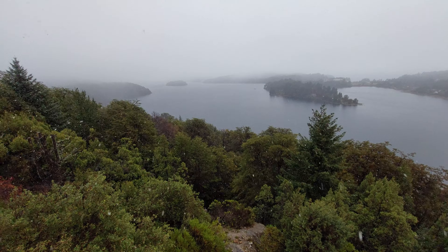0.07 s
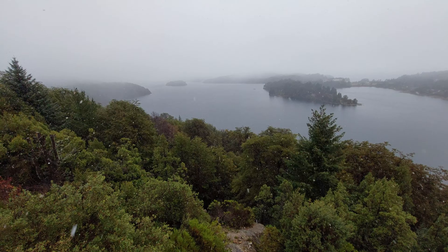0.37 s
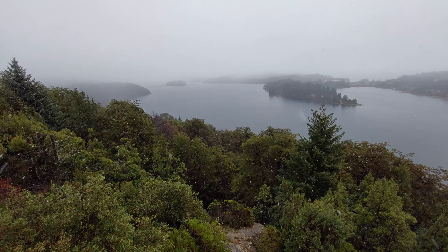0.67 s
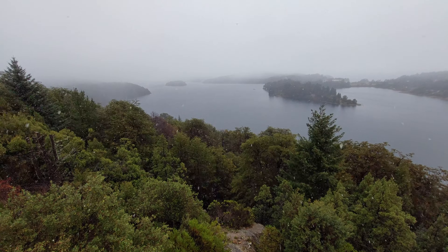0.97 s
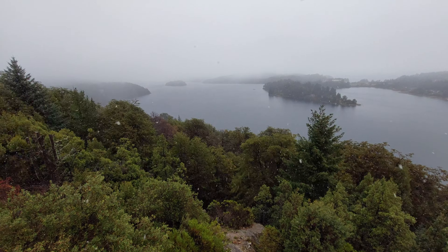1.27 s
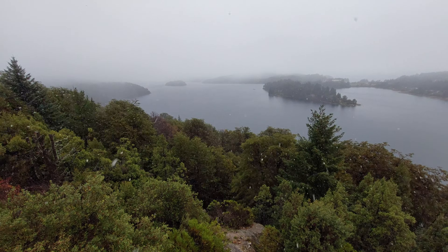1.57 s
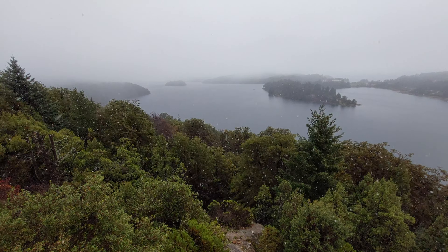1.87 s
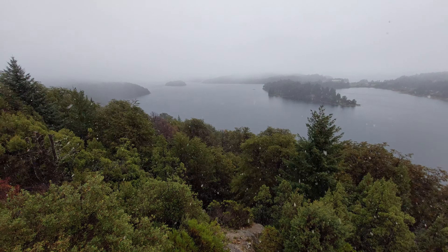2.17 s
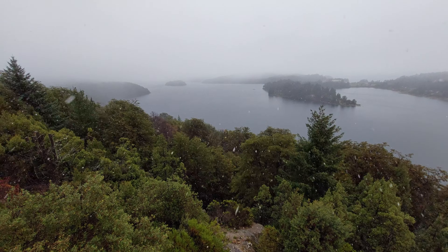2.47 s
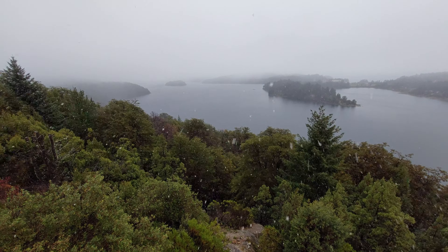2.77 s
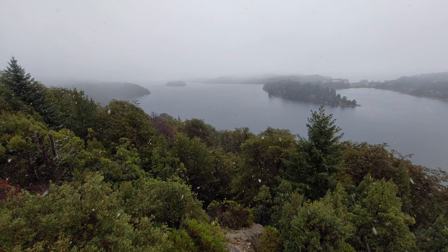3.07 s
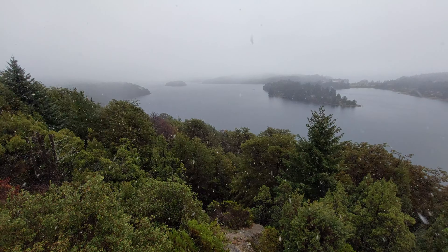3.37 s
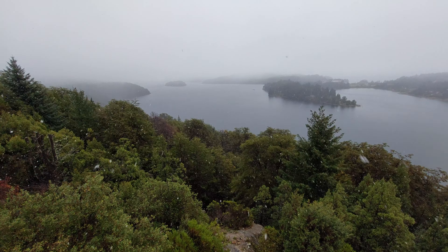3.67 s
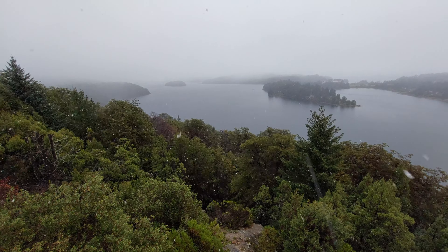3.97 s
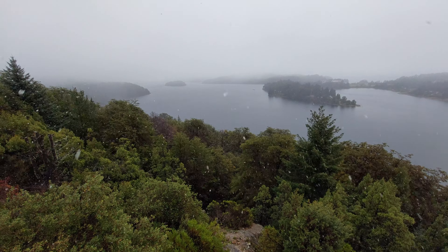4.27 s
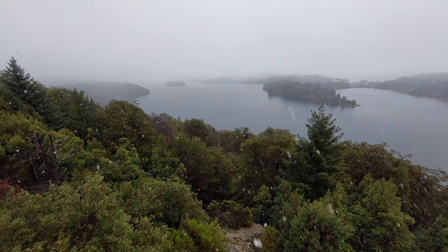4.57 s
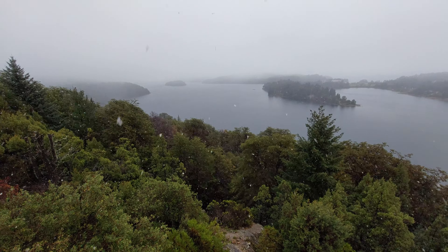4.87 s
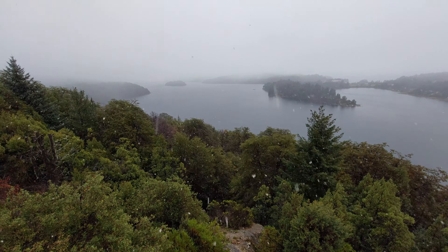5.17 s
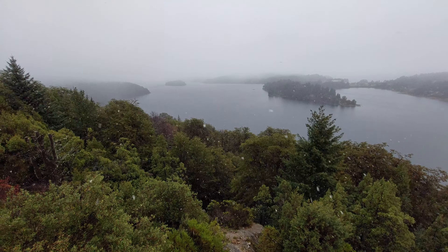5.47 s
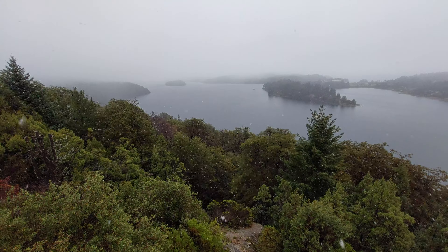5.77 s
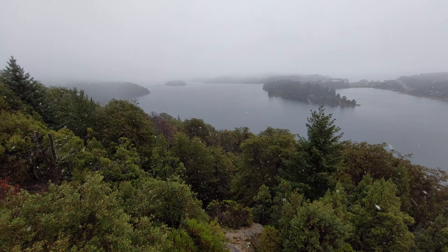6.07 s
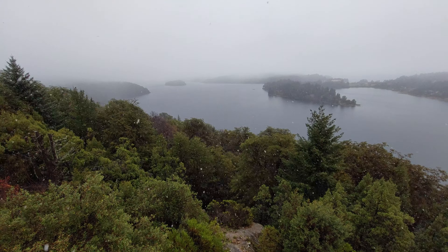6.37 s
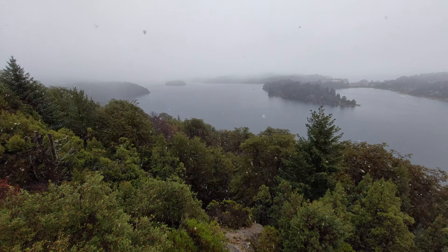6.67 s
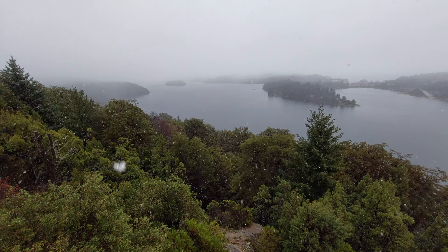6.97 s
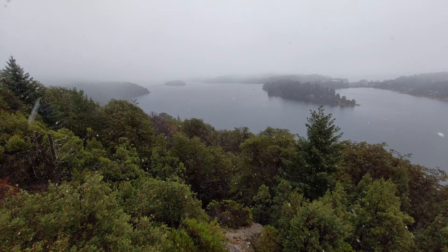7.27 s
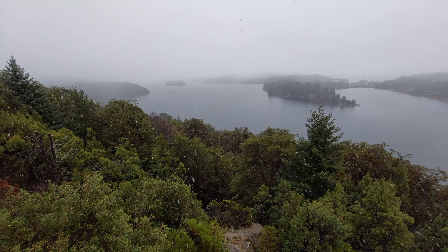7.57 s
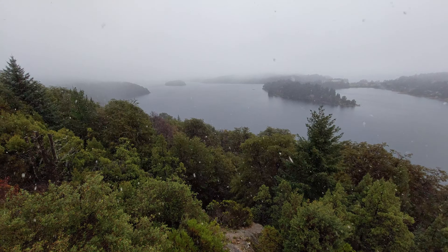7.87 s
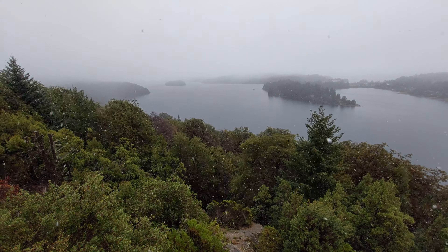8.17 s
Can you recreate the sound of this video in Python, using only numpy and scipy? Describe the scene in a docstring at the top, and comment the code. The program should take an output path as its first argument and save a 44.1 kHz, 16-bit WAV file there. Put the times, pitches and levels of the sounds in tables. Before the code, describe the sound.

A soft rumble of far traffic and a faint engine drone lie under light snow ticking on nearby leaves and the microphone. A small bird chips faintly and regularly among the trees. After about three seconds, uneven gusts buffet the microphone with low thumps, the loudest sounds here, then ease and return twice. Meanwhile a distant vehicle hums gradually nearer on a wet road across the open, wooded hillside.

```python
"""Light snow above a lake

On a wooded slope, small gusts buffet the two ports of the microphone. Far off, roads rumble, an
engine drones across the water, and a vehicle hums and rolls nearer on wet tyres to the right.
Among the trees a small bird repeats a faint, sharp chip, each one a fast downward sweep.
Close by, flakes tick on and around the microphone as their crystals crush, and patter on leaves."""
import sys
import numpy as np
from scipy import signal
from scipy.fft import rfft, irfft, next_fast_len
from scipy.io import wavfile
from scipy.ndimage import uniform_filter1d

SR = 44100
rng = np.random.default_rng(int(sys.argv[2]) if len(sys.argv) > 2 else 0)


def bounce(signal):
    """Save signal as a 16-bit WAV file at the path given by the first command-line argument."""
    frames = np.transpose(np.atleast_2d(signal))
    limited = np.clip(frames, -1, 1)
    pcm = np.round(limited * 32767).astype(np.int16)
    wavfile.write(sys.argv[1], SR, pcm)


N = 362502
TIME = np.arange(N) / SR
FFT_SIZE = next_fast_len(N)
BINS_HZ = np.fft.rfftfreq(FFT_SIZE, 1 / SR)

# Balance of far noise, leaning right through the mids: freq_hz, left_minus_right_db
FAR_LEAN = [(60, 3), (380, 3), (700, -3.5), (1200, -4.5), (2100, -11.5), (3200, -1.5), (4500, -14),
            (8000, 14), (15000, -4)]
# Colours of the distant roads and the faint hiss: freq_hz, gain_db
VALLEY_COLOUR = [(20, -21.5), (65, -1), (130, 1), (185, -15), (240, -7), (400, -12), (690, -14.5),
                 (950, -25), (1200, -22), (1600, -26), (2050, -31), (3000, -42.5), (8000, -50)]
HISS_COLOUR = [(1000, 2), (3200, -3), (4400, 5.5), (5700, -1.5), (8500, -3.5), (11300, -8.5), (12200, -9),
               (14000, -4), (16000, -16)]
# Partials of the engine across the water: level_db
ENGINE_PARTIALS = [-63.5, -69, -79]
# How well its second partial carries: time_s, gain_db
ENGINE_CARRY = [(0, -2), (2.5, -1), (4.8, -1), (5.2, 6), (5.6, -2), (6.8, 4), (7.1, 13), (7.55, 13),
                (8.22, 4)]
# Breeze on the ports between gusts: time_s, relative_db
BREEZE = [(0.14, -62), (0.88, -60.5), (1.12, -50), (1.55, -47.5), (2.0, -51), (2.45, -50.5), (3.0, -48),
          (3.65, -43.5), (4.0, -50), (4.5, -50.5), (5.0, -56), (5.5, -57), (6.25, -55), (6.6, -50),
          (7.1, -47), (7.55, -47), (8.22, -48)]
# Gusts striking the ports: start_s, hold_s, relative_db, left_minus_right_db
GUSTS = [(2.7, .05, -44.5, -7), (3.075, .04, -40, -2), (3.13, .07, -35, -1), (3.22, .11, -37.5, 1),
         (3.395, .025, -33.5, -1), (3.49, .06, -38, 4), (3.765, .03, -36, -4), (3.83, .025, -40, 3),
         (4.015, .045, -38, -24), (4.15, .04, -42, -12), (4.255, .05, -41.5, 0), (4.57, .05, -45.5, 12),
         (4.73, .04, -39.5, 11), (5.615, .025, -47, 10), (5.71, .1, -41.5, 8), (5.825, .025, -35, 10),
         (5.915, .025, -37.5, -19), (6.52, .04, -44, -12), (6.63, .04, -41.5, -12), (7.27, .06, -39.5, -6),
         (7.385, .08, -39.5, 6), (7.755, .11, -35, 8), (7.885, .075, -40.5, 2), (8.135, .045, -33, -20)]
# Colours of the wind's low buffeting and higher flutter: freq_hz, gain_db
BUFFET_COLOUR = [(15, -31), (28, -18.5), (50, 0.5), (70, 2), (125, 0), (155, -5.5), (190, -19.5),
                 (240, -14), (330, -33), (600, -41.5), (1500, -72), (6000, -100)]
FLUTTER_COLOUR = [(70, -33), (160, 3.5), (235, 1), (310, -3), (450, -17.5), (800, -29.5), (2500, -52),
                  (8000, -85)]
# Single eddies thumping a port: centre_s, relative_db, pitch_hz, width_s, left_minus_right_db
EDDIES = [(2.35, -32, 75, .016, 14), (3.077, -27, 230, .002, -22), (3.122, -26, 110, .004, -22),
          (3.138, -19.5, 115, .005, -24), (3.152, -22, 75, .006, 20), (3.212, -26, 140, .004, -12),
          (3.314, -25, 70, .009, -4), (3.4715, -11.5, 205, 0.0016, -28), (3.477, -23, 130, .004, -24),
          (3.522, -23, 100, .007, 22), (3.54, -19.5, 120, .004, 24), (3.766, -21, 150, .003, -12),
          (3.781, -13, 95, .0055, -27), (3.789, -20.5, 240, 0.002, -27), (4.023, -23.5, 125, .007, -24),
          (4.053, -25, 135, .005, -24), (5.783, -28, 85, .009, 10), (5.847, -19, 72, 0.009, 21),
          (5.931, -25, 170, .003, -20), (7.791, -25, 80, 0.025, 18), (7.858, -26, 80, .011, 6),
          (7.944, -27, 135, .011, 0), (8.15, -26.5, 190, .005, -22), (8.163, -22, 85, .014, -22)]
# Tyres coming nearer: time_s, roar_db, tread_db, spray_db
TYRE_LEVELS = [(0.1, -87, -85.5, -95), (1.5, -64, -77, -83), (2.8, -65, -73, -85), (3.5, -59, -68, -80),
               (4.6, -56, -72, -78), (5.5, -52, -66, -77), (6, -52, -66, -82), (7.1, -50, -64.5, -77.5),
               (7.6, -49.7, -62, -69.5), (7.88, -49.5, -56.5, -66), (8.05, -49.8, -60.5, -70),
               (8.22, -50, -58.5, -73)]
# Colours of their roar, tread and wet spray: freq_hz, gain_db
ROAR_COLOUR = [(40, -11), (75, -3.5), (120, -3), (180, -1.5), (240, 8.5), (330, 8.5), (400, 5), (520, 3),
               (680, -0.5), (1050, -4), (1450, -10.5), (2200, -21), (4000, -44)]
TREAD_COLOUR = [(700, -20), (1400, -4), (1950, 2.5), (2450, -4.5), (3100, -14), (4400, -18), (6500, -22),
                (15000, -41)]
SPRAY_COLOUR = [(1400, -14), (2000, 7), (3200, -.5), (4300, .5), (5800, -10), (9000, -24), (15000, -29)]
# Two sinking bands lifted by the ground reflection: time_s, lower_hz, lower_db, upper_hz, upper_db
GROUND_BANDS = [(0.1, 1300, -82.5, 2580, -96), (3.5, 1304, -71, 2400, -80), (4.6, 1078, -66.5, 2300, -78),
                (5.2, 987, -63, 2244, -79), (5.9, 850, -61.5, 2102, -73.5), (6.7, 689, -64, 1600, -66.5),
                (7.05, 640, -62, 1250, -63), (7.6, 560, -64, 1090, -57), (8.22, 502, -65, 940, -61)]
# Bird chips among the trees: time_s, relative_db
CHIPS = [(0.1755, -63.5), (0.758, -61), (1.2225, -61), (1.6525, -63.5), (2.0926, -61), (2.591, -67),
         (2.998, -61), (3.5427, -59), (4.0844, -63), (4.4233, -64), (5.005, -61), (5.5194, -60),
         (6.1155, -62.5), (6.7474, -60), (7.4648, -57), (7.9863, -57.5)]
# The vehicle's hum, swelling and dipping with the air on its way: time_s, level_db
HUM_LEVEL = [(.4, -85), (1.3, -65), (1.7, -62.5), (2.1, -66), (2.55, -56.5), (2.95, -66), (4, -57),
             (4.45, -50.5), (4.85, -58), (5.1, -53.5), (5.55, -55.5), (5.9, -51), (6.35, -49), (6.6, -45.5),
             (6.95, -43.3), (7.3, -47), (7.7, -50.5), (8.15, -45.5)]
# Its note: time_s, pitch_hz
HUM_PITCH = [(0, 280), (1, 298), (2.1, 316), (3.1, 330), (4.45, 339), (5.2, 343.5), (5.7, 344.5),
             (6.75, 341), (7.45, 335.5), (8.22, 327.5)]
# Colour of the snow's patter through the microphone's treble resonance: freq_hz, gain_db
SNOW_COLOUR = [(700, -18), (1900, 6), (3100, 1.5), (4400, 5.5), (6500, 1.5), (8500, 0), (11300, -2.5),
               (12300, -7), (14000, -4.5), (16000, -7)]
# Fine snow blown onto the nearest leaves: start_s, hold_s, level_db, left_minus_right_db
FLURRIES = [(.77, .22, -77.5, 3), (1.2, .33, -79, 3), (2.3, .35, -80, 1), (3.04, .16, -70.5, 1),
            (3.24, .14, -75, 2), (3.39, .13, -71, 2), (3.76, .2, -73, 2), (4.07, .12, -69, 2),
            (4.2, .12, -73, 3), (4.5, .26, -75, 2), (4.95, .32, -75, 2), (5.85, .16, -77, 2),
            (6.2, .2, -76, 2), (6.5, .55, -76, 2), (7.62, .07, -69.5, 3)]
# Flakes landing close by: start_s, relative_db, low_hz, high_hz, left_minus_right_db, crush_t60_s
FLAKES = [(.7555, -59.5, 3500, 12000, 8, .03), (.756, -60, 1200, 3000, 3, .05),
          (.80, -69, 2500, 13000, 6, .012), (.8455, -68, 2800, 15000, 3, .006),
          (.948, -69, 6500, 11000, 3, .012), (.988, -67, 2500, 12000, 2, .01),
          (1.209, -70, 6000, 13000, 1, .02), (1.31, -69, 3500, 9000, 2, .012),
          (1.3887, -56, 7000, 14500, 9, .004), (2.347, -65, 5000, 9000, -4, .01),
          (2.528, -66, 4000, 9000, 2, .012), (2.59, -60.5, 1400, 6500, 2, .022),
          (2.7, -57, 550, 800, 0, .02), (3.0203, -57, 4800, 8000, 8, .014),
          (3.0385, -56, 2800, 7500, -1, .04), (3.04, -57, 1600, 2400, -1, .05),
          (3.081, -60.5, 1400, 7000, -2, .03), (3.105, -65, 3000, 6000, 0, .025),
          (3.12, -58, 1100, 2800, -2, .045), (3.14, -62, 1200, 3500, -1, .05),
          (3.166, -64, 1300, 4000, 0, .04), (3.255, -67, 5800, 6800, 2, .015),
          (3.304, -65, 4300, 5300, 0, .015), (3.342, -67, 7000, 14000, 2, .01),
          (3.419, -60, 3500, 9000, 5, .012), (3.441, -61, 3300, 8500, 3, .01),
          (3.497, -58, 2800, 5200, -4, .008), (3.682, -64, 6000, 9500, -4, .03),
          (3.861, -53.5, 1400, 1950, 0, .02), (3.862, -60, 4500, 15500, 4, .014),
          (4.061, -55.5, 3700, 5600, -5, .008), (4.108, -55, 4400, 7000, -2, .007),
          (4.115, -62, 10500, 15500, 0, .1), (4.224, -64, 2000, 9000, 4, .012),
          (4.275, -58.5, 6300, 9500, 11, .025), (4.294, -64, 4800, 8000, 4, .02),
          (4.7762, -64, 6500, 10000, 3, .008), (4.881, -65, 4500, 10000, 5, .009),
          (4.891, -61.5, 4000, 9000, 3, .014), (4.974, -63, 2500, 10000, 2, .016),
          (5.056, -64, 3500, 9000, 2, .006), (5.0815, -62, 4800, 9000, 6, .014),
          (5.15, -61.5, 3700, 5000, 0, .015), (5.198, -64.5, 1500, 4200, 0, .05),
          (5.234, -66, 1800, 8000, 0, .02), (5.256, -65.5, 2800, 5000, 0, .01),
          (5.349, -59.5, 1700, 2900, -2, .015), (5.8015, -55.5, 5200, 8300, 17, .006),
          (6.2053, -63, 4000, 10000, 2, .008), (6.245, -66, 5000, 15000, 0, .012),
          (6.529, -60.5, 2500, 7500, 2, .009), (7.614, -53, 1700, 6500, 3, .028),
          (7.638, -52.5, 1900, 6000, 3, .045), (7.652, -55, 1900, 5500, 1, .05),
          (7.68, -59, 1900, 7000, 4, .03), (7.729, -66.5, 13000, 15500, 4, .008),
          (7.873, -63, 3500, 7000, 2, .012), (7.963, -65, 5000, 9500, 3, .012),
          (8.141, -62, 7000, 10500, 10, .008)]


def undb(db):
    """Decibels to amplitude."""
    return 10 ** (np.asarray(db) / 20)


def unit(x):
    """Scale to unit RMS."""
    return x / np.sqrt(np.mean(x ** 2))


def curves(table):
    """The columns of a table, joined by straight lines in time."""
    time_s, *columns = np.transpose(table)
    return [np.interp(TIME, time_s, column) for column in columns]


def gain_at(colour):
    """Gain of a colour table at each frequency bin."""
    hz, db = np.transpose(colour)
    return undb(np.interp(np.log(BINS_HZ + 1), np.log(hz), db))


def pan(side_db):
    """Left and right gains of constant power; positive is left."""
    gains = undb(np.array([side_db, -side_db]).reshape(2, -1) / 2)
    return gains / np.sqrt(np.mean(gains ** 2, axis=0))


def walk(rate_hz):
    """Random steps, smoothed twice, at unit RMS."""
    hold = max(int(SR / rate_hz), 2)
    steps = np.repeat(rng.standard_normal(N // hold + 1), hold)
    return unit(uniform_filter1d(uniform_filter1d(steps, hold), hold)[:N])


def band(x, low_hz, high_hz):
    """Gentle causal band-pass."""
    sos = signal.butter(2, [low_hz, min(high_hz, .48 * SR)], "band", fs=SR, output="sos")
    return signal.sosfilt(sos, x)


def add(out, start_s, sound):
    """Mix a short sound in."""
    i = max(int(start_s * SR), 0)
    out[:, i:i + sound.shape[-1]] += sound[:, :max(N - i, 0)]


def white_pair():
    """Spectra of two unrelated white noises."""
    return rng.standard_normal((2, 2 * len(BINS_HZ))).view(complex)


def noise(colour):
    """Unrelated noise at each port, at unit RMS."""
    return unit(irfft(white_pair() * gain_at(colour), FFT_SIZE)[:, :N])


def far_noise(colour, likeness=.8, alike_below_hz=3000, lag_s=.00024):
    """Noise from far right reaches the left port late; the ports agree only on long waves."""
    own, right = white_pair()
    share = likeness / (1 + (BINS_HZ / alike_below_hz) ** 2)
    left = share * right * np.exp(-2j * np.pi * BINS_HZ * lag_s) + np.sqrt(1 - share ** 2) * own
    lean = np.sqrt(gain_at(FAR_LEAN))
    return unit(irfft(np.array([left * lean, right / lean]) * gain_at(colour), FFT_SIZE)[:, :N])


def moving_band(hz, width_hz, likeness=.55, lag_s=.00026):
    """A band of far noise whose centre follows hz; the left port hears it late."""
    lowpass = signal.butter(2, width_hz / 2, fs=SR, output="sos")
    slow = signal.sosfilt(lowpass, rng.random((2, 2, N)) - .5)
    own, right = (slow[0] + 1j * slow[1]) * np.exp(2j * np.pi * np.cumsum(hz) / SR)
    left = likeness * right * np.exp(-2j * np.pi * hz * lag_s) + np.sqrt(1 - likeness ** 2) * own
    return unit(np.array([left.real, right.real]))


def swell_power(table, attack_s, release_s):
    """Power at each port of swells that rise, hold and die away."""
    power = np.zeros((2, N))
    for start_s, hold_s, db, side_db in table:
        t = np.arange(int((3 * attack_s + hold_s + 6 * release_s) * SR)) / SR - 3 * attack_s
        shape = np.exp(-(np.minimum(t, 0) / attack_s) ** 2 - np.maximum(t - hold_s, 0) / release_s)
        add(power, start_s + t[0], (undb(db) * pan(side_db) * shape) ** 2)
    return power


def valley(rumble_db=-56, hiss_db=-76.7):
    """Steady rumble of distant roads, with a faint even hiss."""
    hiss = undb(hiss_db) * noise(HISS_COLOUR) * pan(.7)
    return far_noise(VALLEY_COLOUR) * undb(rumble_db + .56 * walk(3.6)) + hiss


def far_engine(pitch_hz=118.6, orders=(1, 2, 4), fading_db=2.5, wander=.006):
    """An engine runs steadily far across the water; each partial fades in and out on the way."""
    phase = 2 * np.pi * np.cumsum(pitch_hz * (1 + wander * walk(6))) / SR
    carry_db, = curves(ENGINE_CARRY)
    drone = 0
    for order, db in zip(orders, ENGINE_PARTIALS):
        level = undb(db + carry_db * (order == 2) + fading_db * walk(7))
        drone += np.sqrt(2) * level * np.sin(order * phase)
    return drone * pan(1.5)


def wind(trim_db=3, flutter_db=-10, restless_db=1.8, veer_db=5):
    """Each port has its own turbulence; stronger gusts shed smaller eddies and sound higher."""
    breeze_db, = curves(BREEZE)
    breeze = undb(breeze_db + restless_db * walk(14)) * pan(veer_db * walk(12))
    force = undb(trim_db) * np.sqrt(breeze ** 2 + swell_power(GUSTS, attack_s=.016, release_s=.023))
    rumble = noise(BUFFET_COLOUR)
    rumble /= np.sqrt(uniform_filter1d(rumble ** 2, size=3000))  # even churning within a gust
    flutter = noise(FLUTTER_COLOUR) * undb(3.74 * walk(35)) * pan(-5)
    brightness = np.minimum(force / undb(-27.5), 1) ** .65
    return force * (rumble + undb(flutter_db) * brightness * flutter)


def tyres(ground_side_db=-5.5, waver_db=.6):
    """The roar brightens as it nears; the echo off the ground gives it a sinking, hollow colour."""
    roar_db, tread_db, spray_db = curves(TYRE_LEVELS)
    lower_hz, lower_db, upper_hz, upper_db = curves(GROUND_BANDS)
    roar = far_noise(ROAR_COLOUR) * undb(roar_db)
    tread = far_noise(TREAD_COLOUR) * undb(tread_db)
    spray = far_noise(SPRAY_COLOUR) * undb(spray_db)
    ground = moving_band(lower_hz, width_hz=280) * undb(lower_db)
    ground += moving_band(upper_hz, width_hz=360) * undb(upper_db)
    return (roar + tread + spray + ground * pan(ground_side_db)) * undb(waver_db * walk(12))


def bird(high_hz=8600, low_hz=1900, sweep_s=.011, peak_hz=4650, skirt_hz=3200, trees_t60_s=.15):
    """A fast downward sweep, loudest near 4.6 kHz; trunks and leaves scatter a short tail."""
    out, t = np.zeros((2, N)), np.arange(SR // 4) / SR
    for time_s, db in CHIPS:
        progress = np.minimum(t / (sweep_s * (1 + .0764 * rng.standard_normal())), 1)
        hz = high_hz * (low_hz / high_hz) ** progress ** 2.4
        peak = np.exp(-.5 * (np.log(hz / peak_hz) / .13) ** 2)
        skirt = .33 * np.exp(-.5 * (np.log(hz / skirt_hz) / .65) ** 2)
        envelope = np.sqrt(progress * (1 - progress ** 8))
        chip = (peak + skirt) * envelope * np.sin(2 * np.pi * np.cumsum(hz) / SR)
        trees = undb(-27) * rng.standard_normal((2, len(t))) * undb(-60 * t / trees_t60_s)
        trees[:, 0] += .28  # the direct path
        heard = signal.fftconvolve(chip[None], trees, axes=1)
        add(out, time_s - .006, undb(db + 7.3) * pan(-4) * heard / np.abs(heard).max())
    return out


def vehicle_hum(flicker_db=1, rough_db=-17):
    """The drone wavers on its way over the slope; scattered sound roughens it."""
    hz, = curves(HUM_PITCH)
    db, = curves(HUM_LEVEL)
    phase = 2 * np.pi * np.cumsum(hz * (1 + .002 * walk(9))) / SR
    lag_rad = np.array([[.5], [0]])  # it reaches the left port late
    direct = np.sqrt(2) * np.sin(phase - lag_rad) * undb(flicker_db * walk(14))
    scattered = undb(rough_db) * moving_band(hz, width_hz=50)
    return (direct + scattered) * undb(db) * pan(.51)


def patter(per_band_per_s=140, spread_db=3.35, grain_s=.001, smear_s=.012, smear_share=.09):
    """Countless small flakes, each in the band of its leaf, smeared by foliage; a few are larger."""
    def decay(x, decay_s):
        return signal.lfilter([1], [1, -np.exp(-1 / (decay_s * SR))], x)

    out = 0
    for low_hz, high_hz in [(1600, 3400), (3400, 5300), (5300, 7800), (7800, 11000), (11000, 16000)]:
        when, size, side = rng.random((4000, 3))[:int(per_band_per_s * N / SR)].T
        energy = undb(spread_db * np.minimum(-np.log(size), 4)) ** 2
        landings = np.full((2, N), 1e-18)
        landings[:, (when * N).astype(int)] = energy * np.array([side, 1 - side])
        power = decay(landings, grain_s) + smear_share * decay(landings, smear_s)
        out += band(np.sqrt(power) * rng.standard_normal((2, N)), low_hz, high_hz)
    return unit(irfft(rfft(out, FFT_SIZE) * gain_at(SNOW_COLOUR), FFT_SIZE)[:, :N])


def snowfall(steady_db=-76.7, rise_s=1.1):
    """A sparse patter sets in on the nearest leaves and thickens to a rustle in each flurry."""
    steady = undb(steady_db) * np.minimum(TIME / rise_s, 1) ** 2 * pan(2)
    return np.sqrt(steady ** 2 + swell_power(FLURRIES, attack_s=.035, release_s=.07)) * patter()


def close_flakes(grain_db=3, settle_t60_s=.1, settle_db=-21, crack_db=-12, trim_db=-3.8):
    """Crystals crush in a quick run of grains, then settle; each landing spot sounds in its own band."""
    def unit_onset(x):
        return x / np.sqrt(np.mean(x[:, :int(.008 * SR)] ** 2))

    out, t = np.zeros((2, N)), np.arange(SR // 6) / SR
    for start_s, db, low_hz, high_hz, side_db, crush_t60_s in FLAKES:
        grains = np.repeat(undb(grain_db * np.clip(rng.standard_normal(len(t)), -2, 2)), 20)[:len(t)]
        contact = 1 - np.exp(-t / (.02 * crush_t60_s))
        fade = undb(-60 * t / crush_t60_s) + undb(settle_db - 60 * t / settle_t60_s)
        crush = rng.standard_normal((2, len(t))) * grains * contact * fade
        spot = unit_onset(band(crush, low_hz, high_hz))
        crack = undb(crack_db) * unit_onset(band(crush, low_hz / 2, high_hz * 2))
        add(out, start_s + .0006, undb(db + trim_db) * pan(side_db) * (spot + crack))
    return out


def eddies(trim_db=-3):
    """Single eddies thump a port, each with a brief swing of pressure."""
    out, t = np.zeros((2, N)), np.arange(-SR // 16, SR // 16) / SR
    for centre_s, db, hz, width_s, side_db in EDDIES:
        swing = np.exp(-.5 * (t / width_s) ** 2) * np.cos(2 * np.pi * hz * t + rng.uniform(-1.1, 1))
        add(out, centre_s + t[0], undb(db + trim_db) * pan(side_db) * swing)
    return out


def scene():
    """Wind on the ports, traffic in the distance, and the bird and snow on the slope."""
    on_ports = wind() + eddies()
    distant = vehicle_hum() + far_engine() + tyres() + valley()
    return on_ports + distant + bird() + close_flakes() + snowfall()


def record(dry, open_s=.108, top_hz=15800):
    """The microphone opens after a moment and cuts the top."""
    opened = np.clip((TIME - open_s) / .008, 0, 1)
    return signal.sosfilt(signal.ellip(10, .2, 70, top_hz, fs=SR, output="sos"), dry * opened)


dry = scene()
out = record(dry)
bounce(out)
```